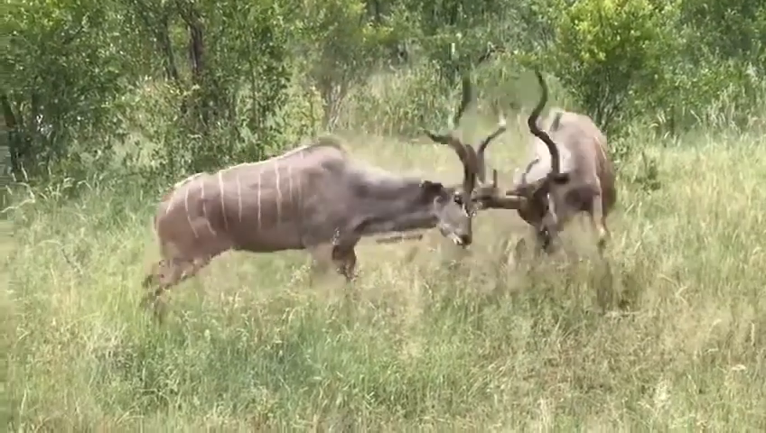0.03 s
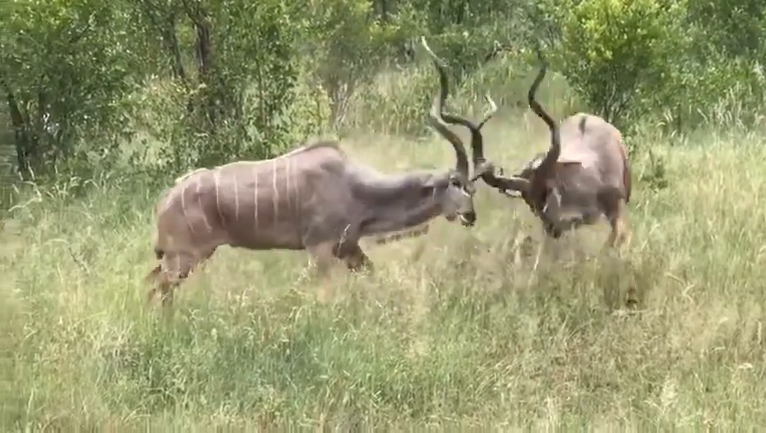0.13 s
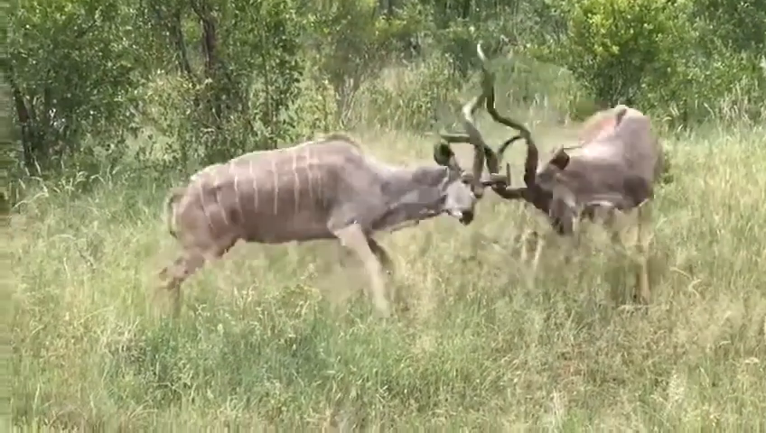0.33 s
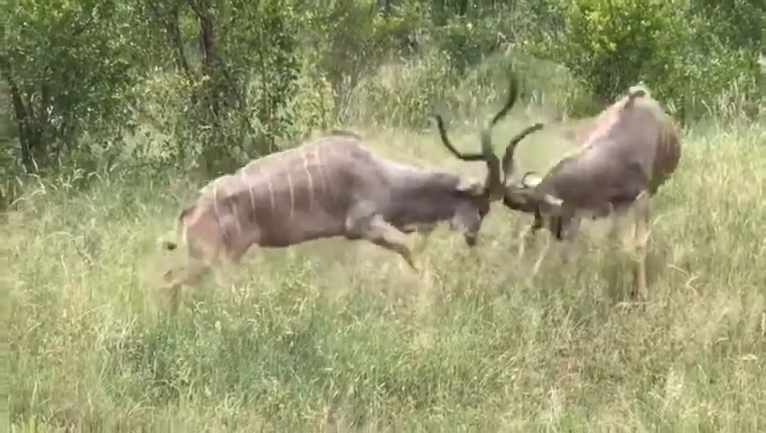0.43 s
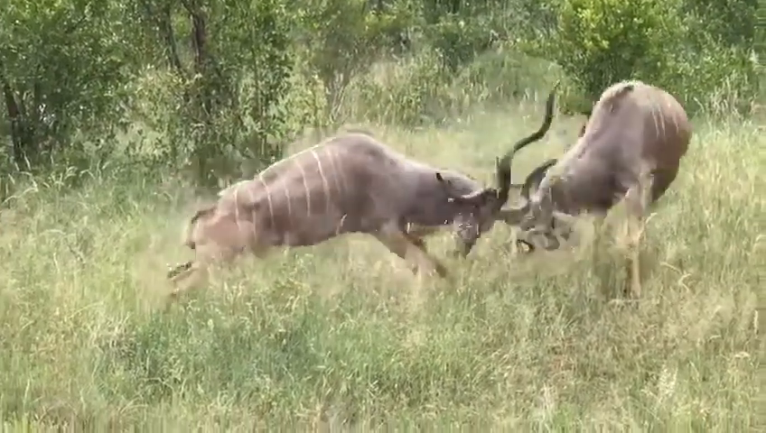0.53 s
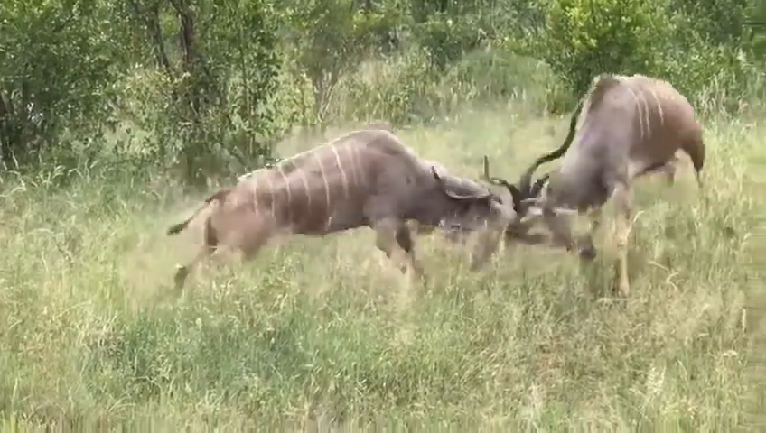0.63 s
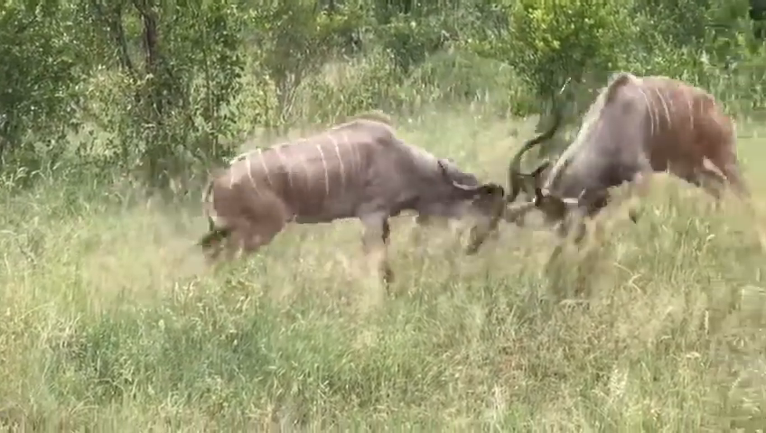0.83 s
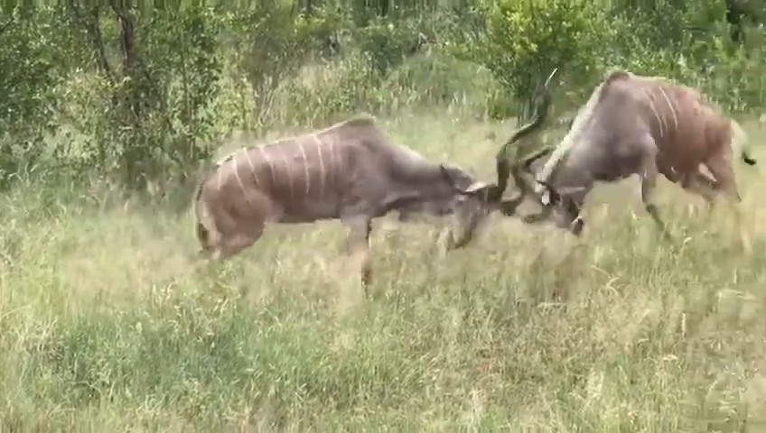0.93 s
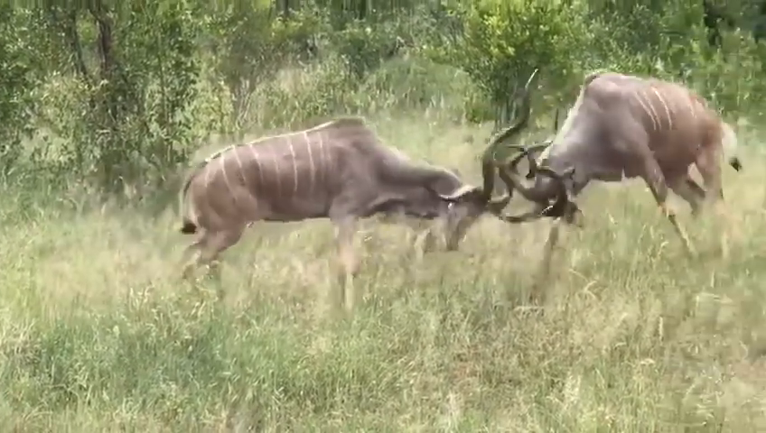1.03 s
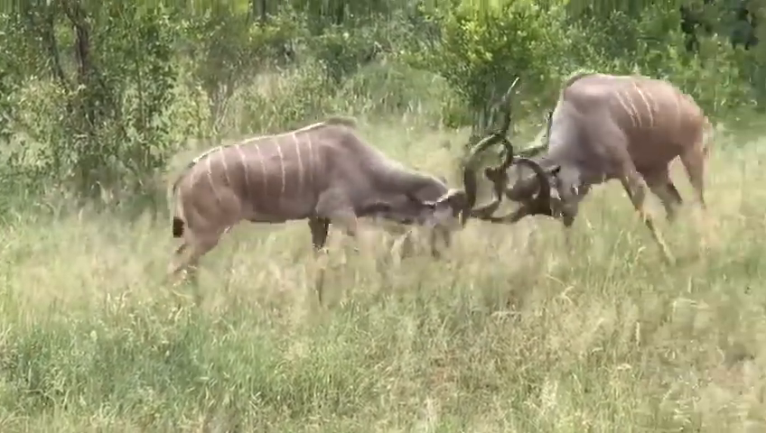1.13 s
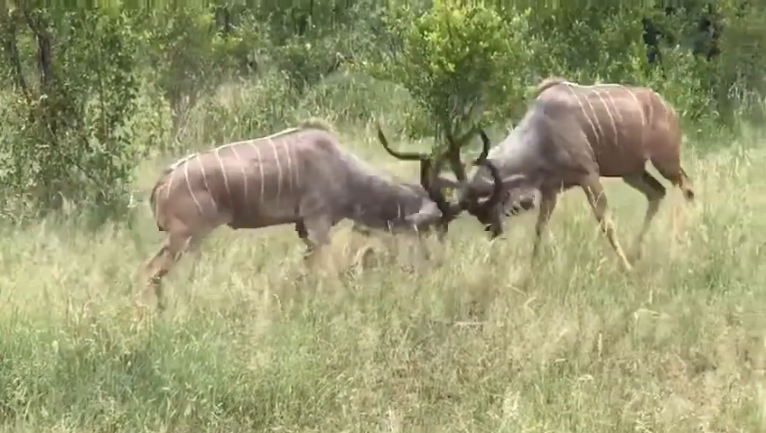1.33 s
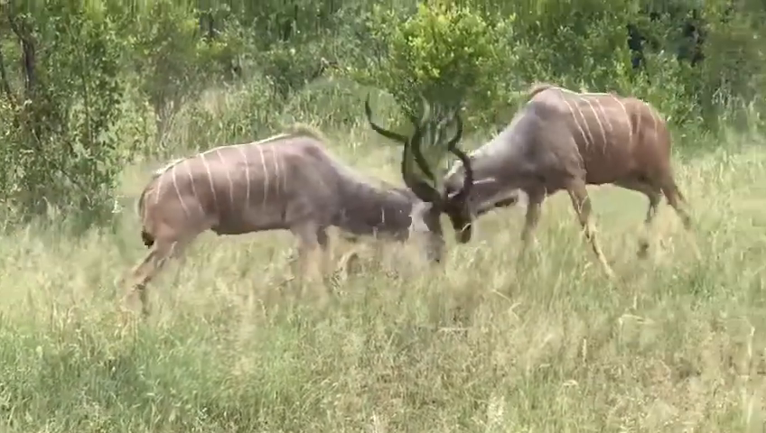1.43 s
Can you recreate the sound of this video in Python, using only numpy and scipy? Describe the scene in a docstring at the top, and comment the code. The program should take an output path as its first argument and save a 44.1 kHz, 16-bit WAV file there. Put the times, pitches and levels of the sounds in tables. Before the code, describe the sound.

Antelope horns knock together, hard and hollow, loudest at about 0.2 seconds, with a faint echo from the bush. Lighter ticks follow at 0.6 seconds, then a squeaky scrape and grinding until 0.9. A second strong knock lands just after 1 second, and a weak tap near 1.4. Soft hoof thuds, swishing and snapping dry grass and light wind run underneath, all some way off.

```python
"""The horns of two sparring antelope bulls knock twice, hard and hollow, some way off in open bush.
Each blow sets a horn ringing. The horns also tick, scrape as their ridges slide, and grind as they lock.
Hooves thud, the ground rumbles, and tall dry grass swishes and snaps round the bulls' legs.
A light wind blows, thin whistles sound far off, and the bushes send back a faint echo of the horns."""
import sys
import numpy as np
from scipy import signal
from scipy.fft import rfft, irfft
from scipy.io import wavfile

SR = 44100
rng = np.random.default_rng(int(sys.argv[2]) if len(sys.argv) > 2 else 0)


def to_wav(sig):
    """Store sig (one row per channel, or 1-D mono) as 16-bit WAV at the path in sys.argv[1].

    Samples outside -1..1 are clipped; the rate is SR.
    """
    pcm = np.clip(np.atleast_2d(sig), -1, 1) * 32767
    pcm = np.round(pcm).astype(np.int16)
    wavfile.write(sys.argv[1], SR, pcm.T)  # frames by channels


N = 66150
T = np.arange(N) / SR

# the tones a horn rings with: f/Hz, level/dB, t60/s (the time to fade by 60 dB)
HORN_TONES = [(214.6, -37.5, 0.19), (396, -34.5, 0.1), (453.4, -35.5, 0.11), (697.3, -28.5, 0.041),
              (910, -27.5, 0.034), (1030, -36, 0.029), (1165, -16.5, 0.012), (1378, -18, 0.016),
              (1592, -19.5, 0.017), (1744, -32.5, 0.041), (2430, -25, 0.0076), (2887, -16, 0.014),
              (3606, -30.5, 0.028)]


def from_db(db):
    """Turn decibels into a number to multiply by."""
    return 10 ** (np.asarray(db) / 20)


def rms_one(x):
    """Scale a sound so that its average power is 1."""
    return x / np.sqrt(np.mean(x ** 2) + 1e-20)


def in_time(rows):
    """Join a table's points with straight lines: one curve for each column after the time."""
    times, *columns = np.transpose(rows)
    return [np.interp(T, times, column) for column in columns]


def band(x, hz, kind):
    """Keep the low part, the high part or a middle band of a sound."""
    sections = signal.butter(2, np.clip(hz, 10, .45 * SR), kind, fs=SR, output="sos")
    return signal.sosfilt(sections, x + 1e-18)


def colour(x, points):
    """Shape a sound's lows and highs along a curve of (f/Hz, level/dB) points; power 1."""
    hz, db = np.transpose(points)
    f = np.maximum(np.fft.rfftfreq(N, 1 / SR), 1)
    gain = from_db(np.interp(np.log(f), np.log(hz), db)) * np.minimum(f / hz[0], 1)
    return rms_one(irfft(rfft(x) * gain, N))


def dying(start, t60):
    """Start suddenly, then fade by 60 dB every t60 seconds."""
    return (T >= start) * from_db(-60 * np.maximum(T - start, 0) / t60)


def drift(per_s):
    """A smooth random wander, about 1 in size."""
    return rms_one(band(rng.standard_normal(N), per_s, "low"))


def grains(per_s, spread_db):
    """Random clicks of uneven size; power 1."""
    size = from_db(spread_db * np.minimum(rng.exponential(1, N), 4)) * rng.choice([-1, 1], N)
    return rms_one(size * (rng.random(N) < per_s / SR))


def resonance(x, hz, width_hz):
    """Let one pitch through at full strength and weaken the rest."""
    r = np.exp(-np.pi * width_hz / SR)
    feedback = [1, -2 * r * np.cos(2 * np.pi * hz / SR), r * r]
    return signal.lfilter(np.array([1, 0, -1]) * (1 - r * r) / 2, feedback, x + 1e-18)


def ring(force, tones):
    """A push sets an object's own tones ringing, and each fades at its own rate."""
    out = 0
    for hz, db, t60 in tones:
        r, c = np.exp(-np.log(1000) / (t60 * SR)), np.cos(2 * np.pi * hz / SR)
        out = out + from_db(db) * signal.lfilter([1, -r * c], [1, -2 * r * c, r * r], force + 1e-18)
    return out


def wind():
    """A light, even rush of air over the bush."""
    # tone colour of the wind: f/Hz, level/dB
    spectrum = [(36, 6), (50, 1.5), (90, 6), (200, -7.5), (400, -10), (800, -8.5), (1500, -4), (2100, -16),
                (5000, -23), (12000, -61)]
    return from_db(-63.5) * colour(rng.standard_normal(N), spectrum)


def whistles():
    """Thin, slightly wavering tones swell and fade far off."""
    # one row a whistle: t/s, length/s, f/Hz, level/dB
    notes = [(-.05, 0.11, 2510, -69), (0.691, 0.073, 2348, -63), (1.453, 0.082, 2940, -71)]
    out, waver_hz = 0, 18.4
    for start, length, hz, db in notes:
        tone = np.sin(2 * np.pi * np.cumsum(hz + waver_hz * drift(per_s=19)) / SR)
        swell = np.sin(np.pi * np.clip((T - start) / length, 0, 1))
        out = out + from_db(db) * swell * rms_one(tone)
    return out


def bush_echo(x):
    """Sound scatters back quick and bright from close by, and as a thin echo from the bushes."""
    near = rng.standard_normal(N) * dying(start=0.011, t60=0.12)
    near = band(near / np.linalg.norm(near), 2200, "high")
    far = rng.standard_normal(N) * dying(start=0.013, t60=0.75)
    far = band(far / np.linalg.norm(far), [1105, 4400], "band")
    return signal.fftconvolve(x, from_db(-9) * near + from_db(-16) * far)[:N]


def grass():
    """Blades hiss in small surges, dry stalks tick and a few crackle as the legs push through."""
    # how the swishing rises and falls: t/s, relative level/dB
    sweeps = [(0, -64.5), (.13, -66.5), (.19, -67.5), (.272, -65), (.312, -57), (.355, -67), (.40, -62.5),
              (.46, -70.5), (.505, -64), (.58, -72.5), (.67, -58.5), (.70, -63.5), (.79, -65.5),
              (.94, -56.5), (1.09, -63.5), (1.14, -59), (1.2, -67.5), (1.5, -72.5)]
    # tone colour of dry grass: f/Hz, level/dB
    spectrum = [(300, 1.5), (1000, 3.5), (1600, -64), (2300, 3.5), (4000, 1.5), (6500, 1.5), (9000, -2),
                (12000, -4)]
    db, = in_time(sweeps)
    ticks = from_db(-7) * grains(per_s=2200, spread_db=4.0)
    crackles = from_db(-14) * grains(per_s=120, spread_db=2.5)
    level = from_db(db + 2.5 + 1.2 * drift(per_s=25))
    return level * colour(rng.standard_normal(N) + ticks + crackles, spectrum)


def snaps():
    """A dry stem breaks in a short, bright burst of tearing fibres."""
    # breaking stems: t/s, level/dB, f/Hz
    stems = [(.398, -61, 6280), (0.507, -57, 4285), (0.6292, -48.5, 4140), (0.653, -56, 6500),
             (0.67, -54.5, 7740), (0.929, -56.5, 3880), (1.364, -61, 6800)]
    out = 0
    for start, db, hz in stems:
        fibres = resonance(grains(per_s=3000, spread_db=1), hz, width_hz=1500)
        out = out + from_db(db) * rms_one(fibres) * dying(start, t60=0.039)
    return out


def trampling():
    """The ground and the heavy bodies rumble as the bulls push."""
    # how the rumble rises and falls: t/s, level/dB
    shoves = [(0, -65.5), (.19, -70.5), (.25, -53.5), (.34, -60), (.47, -68), (.57, -70.5), (.63, -60),
              (.79, -51.5), (.86, -58.5), (1.0, -68.5), (1.09, -56.5), (1.15, -57.5), (1.2, -76),
              (1.27, -73), (1.34, -57), (1.5, -53)]
    # tone colour of the rumble: f/Hz, level/dB
    spectrum = [(60, -5), (120, 0), (195, 3), (280, -8), (400, -16.5), (600, -13.5), (1500, -52),
                (5000, -85)]
    db, = in_time(shoves)
    return from_db(db) * colour(rng.standard_normal(N), spectrum)


def thuds():
    """A hoof or a shoving body makes a low tone that swells and dies, with a little crunch of soil."""
    # dull impacts: t/s, level/dB, f/Hz
    impacts = [(0.073, -56.5, 87.5), (0.226, -44, 124), (.41, -54, 73), (0.659, -52, 166),
               (0.676, -45.5, 96), (0.758, -42, 129), (0.895, -50, 101), (0.93, -46, 92), (0.965, -59, 54),
               (1.04, -44, 125.5), (1.055, -42.5, 349), (1.061, -44, 186), (1.301, -56, 124.5),
               (1.333, -47.5, 120), (1.395, -47.5, 153), (1.429, -43, 121), (1.467, -51, 114)]
    out, rise_s = np.zeros(N), 0.0066
    soil = band(rng.standard_normal(N), 475, "low")
    crunch = from_db(-10.5) * rms_one(band(soil, 67, "high"))
    for start, db, hz in impacts:
        age = np.maximum(T - start, 0)
        swell = age / rise_s * np.exp(1 - age / rise_s)
        out += from_db(db) * swell * (np.sin(2 * np.pi * hz * age) + crunch)
    return out


def grinding():
    """Pressed hard together, the horns' ridges bump over each other in a dull rattle."""
    # spells of grinding: t/s, length/s, level/dB
    spells = [(0.656, 0.012, -52.5), (0.703, 0.056, -57.5), (0.75, 0.031, -52), (0.902, 0.0095, -52),
              (1.125, 0.016, -56), (1.338, 0.037, -52), (1.397, 0.029, -49.5), (1.44, 0.029, -52)]
    # tone colour of the rattle: f/Hz, level/dB
    spectrum = [(100, 0.5), (200, 3), (380, 6), (600, -6.5), (1100, -32), (1600, -3.5), (2200, -17),
                (5000, -73)]
    pressure, rise_s, fall_s = 0, 0.011, 0.0076
    for start, length, db in spells:
        rise = np.clip((T - start) / rise_s, 0, 1)
        fall = np.exp(-np.maximum(T - start - length, 0) / fall_s)
        pressure = pressure + from_db(db) * rise * fall
    slips = grains(per_s=800, spread_db=0.5)
    ringing = rms_one(ring(band(slips, 1400, "low"), HORN_TONES))
    return pressure * rms_one(colour(slips, spectrum) + from_db(-1.5) * ringing)


def scrape():
    """Tiny slips make the ridged horns squeal; the pitch sinks as the contact slides down the horn."""
    # course of the squeal: t/s, level/dB, f/Hz
    slide = [(.68, -76, 2050), (.705, -57, 1905), (.725, -53, 1880), (.745, -60, 1940), (.762, -55.5, 1820),
             (.795, -57.5, 1790), (.825, -58, 1690), (.858, -56, 1740), (.89, -77, 1720)]
    # tones in the squeal: multiple of its pitch, width/Hz, level/dB
    tones = [(1, 47, -0.5), (.9, 170, 0), (.66, 280, -5.5), (2.5, 180, -12.5)]
    db, hz = in_time(slide)
    phase, out = 2 * np.pi * np.cumsum(hz) / SR, 0
    for multiple, width_hz, tone_db in tones:
        tone, decay = np.exp(1j * multiple * phase), np.exp(-np.pi * width_hz / SR)
        slips = grains(per_s=2000, spread_db=9.0)
        swing = signal.lfilter([1], [1, -decay], slips / tone + 1e-9)   # each slip kicks the tone
        evened = swing / np.abs(swing) ** .5   # friction evens out big and small swings
        out = out + from_db(tone_db) * rms_one((tone * evened).real)
    sliding = (T > slide[0][0]) & (T < slide[-1][0])
    return from_db(db) * rms_one(out) * sliding


def ground_bounce(x):
    """A weaker, flipped copy bounces off the soft ground, arrives late and makes the sound hollow."""
    share, delay_s = .52, 0.002371
    return x - share * np.interp(T - delay_s, T, x, left=0)


def travel(push, delay_s):
    """High tones run faster along a horn, so a blow arrives as a falling sweep; 1 kHz takes delay_s."""
    hz = np.fft.rfftfreq(2 * N, 1 / SR)
    phase_lag = 4 * np.pi * delay_s * np.sqrt(1000 * hz)
    return irfft(rfft(push, 2 * N) * np.exp(-1j * phase_lag))[:N]


def knocks():
    """Each blow runs down the horn and back and sets it ringing; horns pressed together ring shorter."""
    # horn on horn: t/s, level/dB, brightness/Hz, pitch of the spot struck/Hz, boost at that pitch/dB,
    # surface crack/dB, travel time at 1 kHz/s, share of the free ring time (0-1)
    blows = [(.067, -39.5, 890, 820, 15, -80, .002, 0.2),
             (0.2115, -3.5, 1340, 821, 13.5, -38, 0.00069, 0.87),
             (0.224, -30, 1400, 1300, -7, -73, 0.0026, 0.3),
             (0.6222, -33, 2800, 990, 10, -54.5, 0.00059, 0.46),
             (0.6288, -32, 3520, 1030, 7.5, -55.5, 0.0004, 0.96),
             (0.6313, -36, 4270, 2200, 13, -63, 0.00039, .6),
             (.667, -35.5, 2000, 1290, 10, -53, 0.002, 0.5),
             (1.026, -26.5, 1260, 1120, 11, -59, 0.0042, 0.04), (1.05, -9, 1204, 1090, 8, -76, .0038, 0.69),
             (1.388, -31.5, 990, 974, 10.5, -77, 0.0032, 0.35)]
    # the brief, high tones of the horn's hard surface: f/Hz, level/dB, t60/s
    surface_tones = [(5000, -16, 0.0083), (6150, 2.5, 0.0022), (7100, 0, 0.004), (8200, -3.5, 0.0048)]
    out, crack = np.zeros(N), np.zeros(N)
    for start, db, bright_hz, spot_hz, boost_db, crack_db, delay_s, ring_share in blows:
        touch = 1.0 * (np.arange(N) == int(start * SR))
        blow = travel(touch, delay_s)
        back_from_tip = from_db(-15) * travel(touch, delay_s=.0125)
        push = from_db(db) * band(blow + back_from_tip, bright_hz, "low")
        force = push + (from_db(boost_db) - 1) * resonance(push, spot_hz, width_hz=234)
        out += ring(force, [(hz, tone_db, t60 * ring_share) for hz, tone_db, t60 in HORN_TONES])
        crack += from_db(crack_db) * blow
    return out + ring(crack, surface_tones)


def scene():
    """Horns and their echo, over hooves, grass, wind and whistles, in one channel."""
    horns = ground_bounce(knocks()) + scrape() + grinding()
    mix = horns + bush_echo(horns) + thuds() + trampling() + grass() + snaps() + wind() + whistles()
    return mix[None]


def record(dry):
    """Thin out the deepest rumble and cut the highest treble steeply."""
    low_hz, top_hz = 32, 12000
    thinned = signal.sosfilt(signal.butter(2, low_hz, "high", fs=SR, output="sos"), dry)
    return signal.sosfilt(signal.ellip(12, .1, 80, top_hz, fs=SR, output="sos"), thinned)


dry = scene()
out = record(dry)
to_wav(out)
```